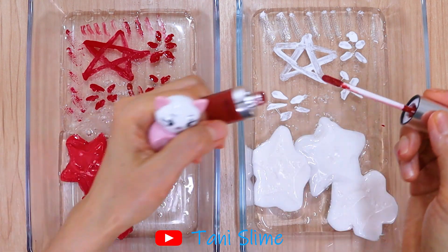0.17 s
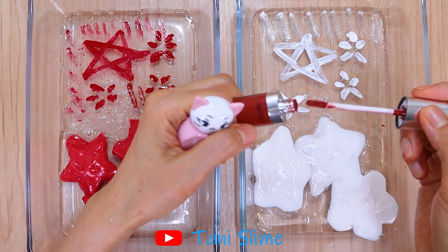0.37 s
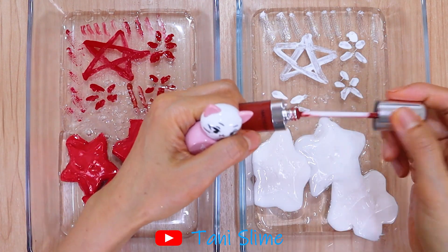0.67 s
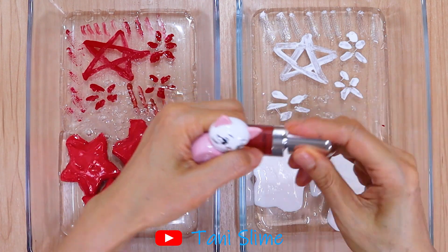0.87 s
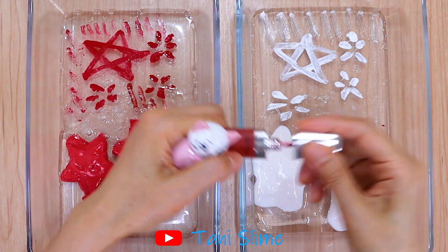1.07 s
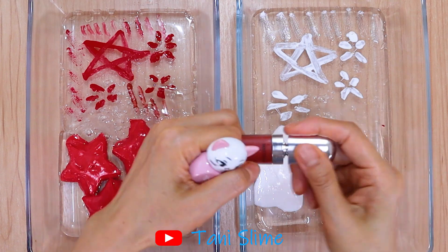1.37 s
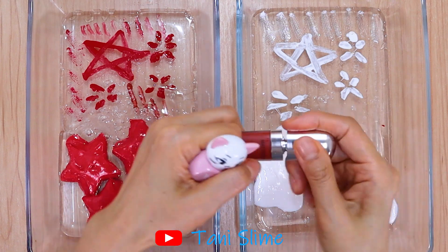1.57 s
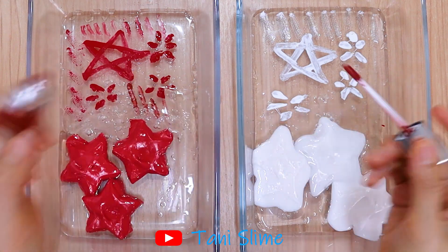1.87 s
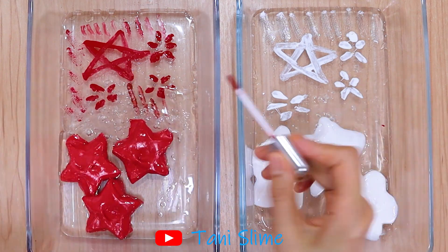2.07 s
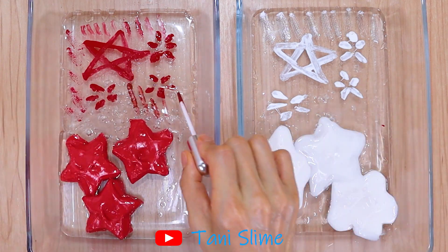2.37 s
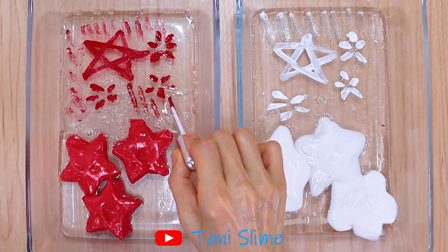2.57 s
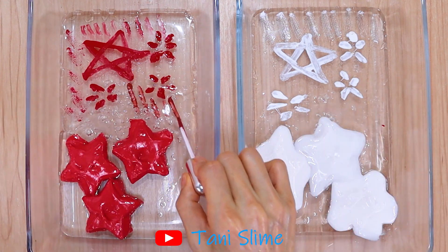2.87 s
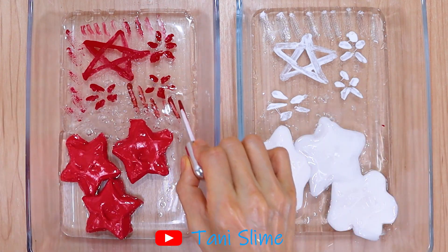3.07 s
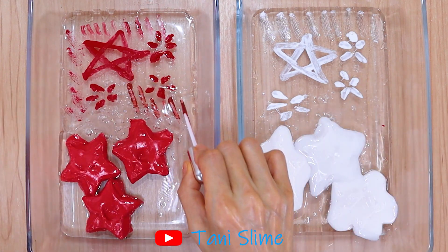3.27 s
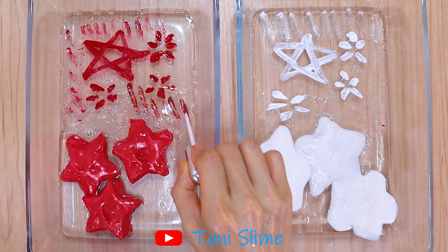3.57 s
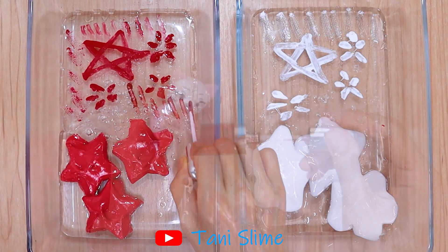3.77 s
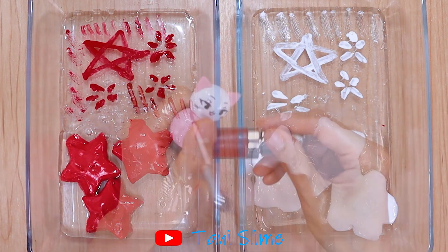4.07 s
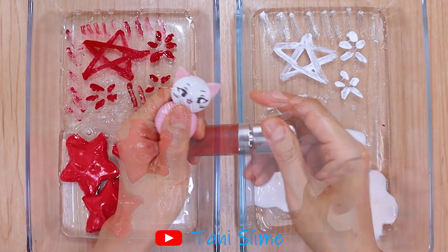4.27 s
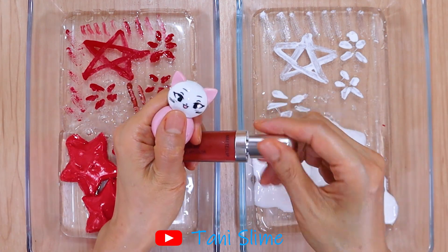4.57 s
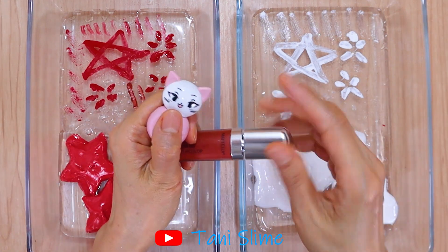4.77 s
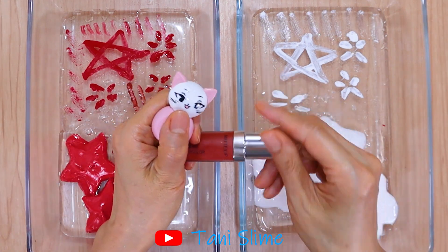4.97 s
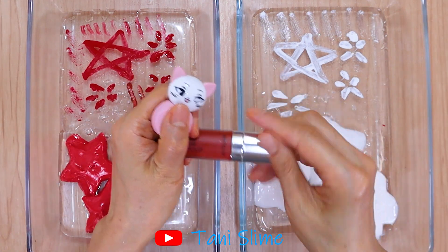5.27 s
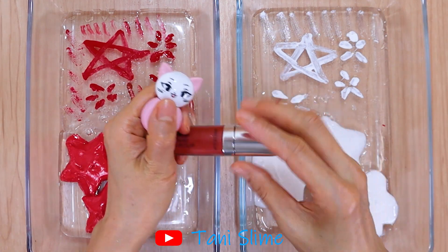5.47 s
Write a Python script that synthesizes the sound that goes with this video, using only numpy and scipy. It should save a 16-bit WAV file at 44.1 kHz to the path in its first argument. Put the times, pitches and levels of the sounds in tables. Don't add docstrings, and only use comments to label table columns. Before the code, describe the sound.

Close plastic handling in a quiet room: short bright squeaks, five hard clacks, a silent gap, a soft wet pop, a snap, two squeaky twists.

```python
import sys
import numpy as np
from scipy import signal
from scipy.fft import rfft, irfft
from scipy.io import wavfile
from scipy.ndimage import uniform_filter1d

SR = 44100
rng = np.random.default_rng(int(sys.argv[2]) if len(sys.argv) > 2 else 0)


def amp(db):
    return 10 ** (np.asarray(db, float) / 20)


def write(x):
    x = np.atleast_2d(x).T
    wavfile.write(sys.argv[1], SR, np.round(np.clip(x, -1, 1) * 32767).astype(np.int16))


N = 248283


def evened(x):
    return x / np.sqrt(np.mean(x ** 2) + 1e-20)


def read_spectrum(points, hz):
    f, value = np.transpose(points)
    return np.interp(np.log(hz + 1), np.log(f + 1), value)


def add(mix, start_s, sound):
    part = mix[round(start_s * SR):][:len(sound)]
    part += sound[:len(part)]


def high_passed(x, hz):
    return signal.sosfilt(signal.butter(4, hz, "high", fs=SR, output="sos"), x)


# pitch_hz, width_hz, level_db
HISS_DIP = (43, 9, -7)


def coloured(points):
    hz = np.fft.rfftfreq(N, 1 / SR)
    dip_hz, width_hz, depth_db = HISS_DIP
    dip_db = depth_db * np.exp(-((hz - dip_hz) / width_hz) ** 2)
    gain = amp(read_spectrum(points, hz) + dip_db)
    return evened(irfft(rfft(rng.standard_normal(N)) * gain, N))


# pitch_hz, level_db (per Hz)
HISS = [(18, -40.5), (30, -14.5), (53, -4.5), (114, -4.5), (149, -13.5), (179, -1), (226, -9), (302, -9),
        (448, -11), (538, -11), (1280, -14), (7430, -20), (8040, -20.5), (14700, -21), (15900, -21)]
# pitch_hz, level_db (rms), waver_hz
HUM = [(59.4, -70.5, 1.9), (171, -70.5, 11), (294.5, -74.5, 8), (421, -75, 5), (490, -82.5, 28),
       (796, -87, 8)]
# pitch_hz, level_db (rms)
WHINE = [(8220, -76.5), (8280, -76.5)]


def hiss_and_hum():
    t = np.arange(N) / SR
    out = amp(-59) * coloured(HISS)
    for hz, db, waver_hz in HUM:
        r = np.exp(-np.pi * waver_hz / SR)
        noise = rng.standard_normal(N) + 1j * rng.standard_normal(N)
        waver = signal.lfilter([1], [1, -r], noise)
        steady = 0.21
        hum = (steady + waver / np.std(waver)) * np.exp(2j * np.pi * hz * t)
        out += amp(db) * evened(hum.real)
    for hz, db in WHINE:
        out += amp(db) * np.sqrt(2) * np.sin(2 * np.pi * (hz * t + rng.random()))
    return out


# pitch_hz, level_db (per Hz)
SIDE_HISS = [(20, -17), (77, -12), (134, -4.5), (542, 0), (607, 0.5), (1290, -4.5), (1570, -3),
             (2910, -1.5), (14700, -3.5), (16000, -13)]
# time_s, level_db
BED_GAIN = [(0, 2), (1.4, 2), (1.475, 0), (1.6, 4.5), (1.712, 0.5), (1.8, 1.5), (1.93, -1.5), (2.0, -0.5),
            (2.08, 1), (2.25, -2.5), (2.47, 0), (3.03, 1.5), (5.63, 2)]


def background():
    level = amp(np.interp(np.arange(N) / SR, *np.transpose(BED_GAIN)))
    return level * hiss_and_hum(), level * amp(-71.5) * coloured(SIDE_HISS)


def pings(rows, rise_cycles):
    out, t = np.zeros(N), np.arange(8000) / SR
    for start_s, db, hz, t60_s in rows:
        envelope = amp(db - 60 * t / t60_s) * np.minimum(t * hz / rise_cycles, 1)
        add(out, start_s, envelope * np.sin(2 * np.pi * hz * t))
    return out


# start_s, level_db (peak), pitch_hz, t60_s
THUDS = [
    (.076, -40, 200, .1),
    (.075, -43, 400, .06),
    (2.125, -38, 180, .06),
    (2.141, -33, 190, .12),
    (1.262, -43, 290, .07),
    (2.132, -41, 120, .08),
    (1.187, -46, 190, .08),
    (1.554, -40, 450, .06),
    (4.491, -38, 380, .06),
]


def table_thuds():
    return pings(THUDS, rise_cycles=0.45)


def pressure(t, strokes):
    hardest_s, db, swell_ms, release_ms = np.transpose(strokes)[:, :, None]
    ms = (t - hardest_s) * 1000
    sunk = np.where(ms < 0, -ms / np.maximum(swell_ms, 2), ms / np.maximum(release_ms, 2))
    return np.sqrt((amp(db - 20 * sunk) ** 2).sum(axis=0))


def rubbing(span_s, strokes, swells, modes, slips_per_s, spread_db, patchy_db, scrape_db):
    at = np.arange(round(span_s[0] * SR), round(span_s[1] * SR) + 500)
    t, n = at / SR, len(at)
    happens = rng.random(n) < slips_per_s / SR
    strength = amp(spread_db * np.minimum(rng.exponential(1, n), 4))
    slips = rng.standard_normal(n) * happens * strength
    patchy_db = min(patchy_db, 3.5)
    squeak = np.zeros(n)
    for hz, width_hz, db in modes:
        turn = np.exp(2j * np.pi * hz * t)
        r = np.exp(-np.pi * width_hz * 1.5 / SR)
        wander = uniform_filter1d(rng.standard_normal(n), size=700)
        wander = evened(uniform_filter1d(wander, size=450))
        own_slips = np.roll(slips, rng.integers(n))
        rung = signal.lfilter([(1 - r) ** 2], [1, -2 * r, r ** 2], own_slips / turn)
        squeak += amp(db + patchy_db * wander) * (turn * rung).real
    band = signal.butter(2, [700, 16000], "band", fs=SR)
    scrape = evened(signal.lfilter(*band, rng.standard_normal(n)))
    press = pressure(t, strokes)
    swell_ms, release_ms = 13, 65
    swell = pressure(t, [(s, db, swell_ms, release_ms) for s, db in swells])
    sound = press * evened(squeak) + (amp(scrape_db) * press + swell) * scrape
    out = np.zeros(N)
    out[at] = sound * signal.windows.tukey(n, 1300 / n)
    return out


# start_s, end_s
WAND_S = [
    (1.11, 1.256),
    (1.37, 1.548),
    (1.635, 1.763),
    (1.85, 1.978),
    (2.07, 2.118),
]
# hardest_s, level_db, swell_ms, release_ms
WAND = [
    [(1.14, -50, 18, 30), (1.182, -43, 60, 23), (1.195, -35, 10, 26), (1.213, -39.5, 18, 67),
     (1.25, -37.5, 25, 30)],
    [(1.399, -46, 5, 22), (1.416, -46.5, 37, 50), (1.437, -47, 30, 25), (1.452, -48, 8.8, 20),
     (1.488, -47, 6, 46), (1.509, -45, 9.2, 60), (1.542, -51, 40, 15)],
    [(1.652, -47.5, 6, 24), (1.672, -45, 20, 26), (1.69, -49, 15, 25), (1.724, -44.5, 22, 30),
     (1.742, -48.5, 15, 30)],
    [(1.894, -50.5, 40, 44), (1.955, -46.5, 28, 33)],
    [(2.095, -55, 15, 40), (2.118, -45, 25, 10)],
]
# loudest_s, level_db
SWELLS_BEFORE_KNOCKS = [
    [(1.247, -42.5)],
    [(1.538, -42.5)],
    [(1.746, -45)],
    [(1.96, -46.5)],
    [(2.11, -47)],
]
# pitch_hz, width_hz, level_db
WAND_MODES = [
    [(2600, 190, -18), (3700, 250, -17.5), (5450, 560, -12), (6220, 250, -6), (7000, 200, 2),
     (7550, 280, -2), (8700, 200, -4), (9800, 150, -16.5), (11500, 250, -19), (12700, 400, -16),
     (14000, 250, -16)],
    [(2650, 150, -19), (3868, 200, -20.5), (5170, 300, -12), (6950, 180, -5), (7300, 150, -4.5),
     (7800, 250, 1), (9100, 250, -10)],
    [(4200, 250, -13.5), (5900, 120, -9.5), (6570, 150, -6.5), (6900, 150, -4), (7200, 150, -2.5),
     (7900, 160, -2.5), (9800, 150, -8.5), (10500, 200, -12.5)],
    [(2700, 200, -17.5), (6900, 120, -1.5), (7700, 210, -0.5), (9400, 300, -7.5)],
    [(2600, 300, -14), (7500, 400, 6.5), (9300, 300, -6.5)],
]


def wand_squeaks():
    passes = zip(WAND_S, WAND, SWELLS_BEFORE_KNOCKS, WAND_MODES)
    return sum(rubbing(*one, slips_per_s=13000, spread_db=1.5, patchy_db=2, scrape_db=-11) for one in passes)


# start_s, level_db (peak),
# pitch_hz, t60_s
CATCHES = [(1.1943, -22.5, 7500, 0.013), (1.4372, -22, 7680, 0.014), (1.449, -39, 6950, 0.03),
           (1.506, -35.5, 7160, 0.023), (1.514, -37.5, 7200, .02), (1.684, -30.5, 6900, 0.02),
           (1.684, -34, 7900, .025), (2.1238, -24, 7500, 0.047), (2.1238, -31.5, 6750, 0.02),
           (2.1298, -19, 7500, 0.022), (2.1525, -38, 7950, .03), (1.129, -48, 3700, 0.043),
           (1.458, -45.5, 5170, 0.024), (1.89, -44, 7720, .03), (1.946, -49, 6900, .06),
           (4.446, -28.5, 2940, 0.022), (4.447, -42, 5550, 0.045), (4.411, -50, 13200, .06),
           (4.464, -36.5, 8400, .012), (4.473, -42, 7120, 0.032), (5.072, -41, 5170, 0.074),
           (5.467, -35.5, 8800, 0.027), (1.304, -45, 2650, 0.046), (1.594, -42, 2600, 0.029)]


def small_catches():
    return pings(CATCHES, rise_cycles=7.8)


def causal(points, size=2048):
    db = read_spectrum(points, abs(np.fft.fftfreq(size, 1 / SR)))
    log_gain = np.log(amp(np.maximum(db, -100)))
    return np.fft.ifft(np.exp(np.conj(signal.hilbert(log_gain)))).real[:size // 2]


def ringing(modes, size):
    t, out = np.arange(size) / SR, np.zeros(size)
    for hz, width_hz, db in modes:
        out += amp(db) * width_hz * np.exp(-np.pi * width_hz * t) * np.sin(2 * np.pi * hz * t)
    return out


def rattle(length_ms):
    t_ms = np.arange(1024) * 1000 / SR
    shape = np.exp(-t_ms / length_ms) * np.minimum(t_ms / 0.27, 1)
    noise = rng.standard_normal(1024)
    for _ in range(6):
        z = rfft(noise * shape)
        flat = irfft(z / np.sqrt(abs(uniform_filter1d(abs(z) ** 2, size=5)) + 1e-30))
        noise = flat / np.sqrt(abs(uniform_filter1d(flat ** 2, size=21)) + 1e-30)
    return noise * shape


def clack(contacts, colour, rings, ring_db, low_cut_hz, high_cut_hz, bloom_ms):
    crack, ring = causal(colour, size=8192), ringing(rings, size=4096)
    body = crack / np.linalg.norm(crack) + amp(ring_db) * ring / np.linalg.norm(ring)
    t_ms = np.arange(1, len(body) + 1) * 1000 / SR
    body = body * np.minimum(t_ms / bloom_ms, 1)
    body = high_passed(high_passed(body, low_cut_hz), low_cut_hz)
    body = signal.sosfilt(signal.butter(5, high_cut_hz, fs=SR, output="sos"), body)
    out = np.zeros(N)
    for start_s, db, length_ms in contacts:
        sound = signal.fftconvolve(rattle(length_ms), body)
        add(out, start_s, amp(db) * sound / abs(sound).max())
    return out


# pitch_hz, t60_s
ROOM = [(300, 0.15), (1000, 0.14), (2500, 0.2), (5000, 0.18), (9000, 0.11), (15000, 0.068)]


def room():
    taps, size = np.zeros(SR // 2), 10
    at = np.arange(100, len(taps) - size, size)
    taps[at + rng.integers(0, size, len(at))] = rng.choice([-1., 1.], len(at))
    t_ms = np.arange(len(taps)) * 1000 / SR
    wall_ms, wall_db = 18, 3
    wall = amp(wall_db * np.exp(-((t_ms - wall_ms - 1.5) / 8.0) ** 2))
    taps *= np.clip(t_ms / 6.9, 0, 1) * wall
    hz, t, z = signal.stft(taps, SR, nperseg=128)
    over_db = 1 * np.maximum(t * 1000 - 49, 0)
    early = amp(-60 * t / read_spectrum(ROOM, hz)[:, None] - over_db)
    late_db, late_t60_s = -22, 0.4
    late = amp(late_db - 60 * t / late_t60_s)
    tail = signal.istft(z * (early + late), SR, nperseg=128)[1]
    z = rfft(tail)
    fine = uniform_filter1d(abs(z) ** 2, size=40)
    broad = uniform_filter1d(abs(z) ** 2, size=600)
    tail = irfft(z * np.sqrt(broad / fine))[:SR // 3]
    tail[:200] *= np.arange(200) / 200
    return tail / np.linalg.norm(tail)


# pitch_hz, level_db
ROOM_TILT = [(300, 2), (1000, 3), (2500, -3), (5000, -2.5), (9000, 4), (15700, 4)]


def echoes(hit, send_db, blur_hz):
    power, out, size = hit ** 2, np.zeros(N), 4096
    first = np.flatnonzero(hit)[0]
    spectrum = abs(rfft(hit[first:first + size])) ** 2
    broad = uniform_filter1d(spectrum, max(round(blur_hz * size / SR), 1))
    hz = np.fft.rfftfreq(size, 1 / SR)
    broad_db = 10 * np.log10(abs(broad) / broad.max() + 1e-10)
    colour = np.transpose([hz, broad_db + read_spectrum(ROOM_TILT, hz)])
    tail = signal.oaconvolve(room(), causal(colour, size=size))
    answer_s = np.searchsorted(np.cumsum(power), 0.18 * power.sum()) / SR
    add(out, answer_s, amp(send_db) * np.sqrt(power.sum()) * tail / np.linalg.norm(tail))
    return out


# start_s, level_db, length_ms
CLACKS = [
    [(1.2612, -1.5, 1.04), (1.2627, -4.5, 2), (1.2655, -7, 0.89), (1.2672, -3, 0.72), (1.2688, -8, 1.13)],
    [(1.5537, -2.5, 0.9), (1.5558, -10, 1.7), (1.5585, -2, 0.32), (1.5594, -4.5, 1.5)],
    [(1.7694, 5, 0.99), (1.771, -1.5, 1.06), (1.775, -12, 0.64)],
    [(1.9845, -37.5, 1.7), (1.9851, 3, 1.39), (1.9867, -2, 1.1), (1.9988, -13.5, 3.1)],
    [(2.1255, -17.5, 3.2), (2.1321, -7.5, 0.87), (2.1335, -10, 2.24), (2.1372, -9, 1.28),
     (2.1455, -22.5, 2.5)],
    [(3.8079, -13, 0.021)],
    [(4.4903, -4, 2.2), (4.4925, -6.5, 2.3), (4.498, -2.5, 1.1), (4.5005, -15, 1)],
]
# pitch_hz, level_db
COLOURS = [
    [(120, -85.5), (200, -31), (600, -19), (1000, -20.5), (1390, -10), (1640, -16), (2600, -3), (3020, -12),
     (5060, -18), (6550, -19), (14500, -31), (16400, -54.5)],
    [(120, -54.5), (200, -30), (361, -41.5), (652, -13.5), (1700, -5), (2650, 4), (3500, -6), (5160, -7.5),
     (5650, -7.5), (15000, -29), (16400, -54.5)],
    [(120, -59), (200, -37), (876, -6.5), (1500, -23.5), (2460, 0), (4970, -2.5), (8030, -9), (8810, -6.5),
     (9480, -14), (14000, -12), (16400, -47.5)],
    [(120, -67.5), (200, -39), (876, -6.5), (1900, -9), (2600, 6), (3910, -1.5), (7060, -4.5), (9140, -12),
     (10000, -11.5), (14800, -16.5), (16400, -39.5)],
    [(59, -34.5), (100, -7.5), (430, -22), (600, -42), (900, -4), (1480, -5), (2080, -17), (2860, -4),
     (3400, -18.5), (4030, -9), (7480, -12), (13900, -32), (15500, -19.5), (16500, -49.5)],
]
# pitch_hz, level_db
POP_COLOUR = [(500, -38), (786, -9), (1160, -24), (1360, 1), (1910, -45), (2650, 15), (3930, -41),
              (5000, -55)]
# pitch_hz, level_db
SNAP_COLOUR = [(120, -54), (200, -29), (1110, -3.5), (2510, -0.5), (2800, -1), (4060, -6.5), (8650, -7.5),
               (10800, -20), (12100, -37.5), (14200, -23), (16500, -48.5)]
# pitch_hz, width_hz, level_db
RINGS = [
    [(1390, 44, -8.5), (2130, 95, -8.5), (2675, 85, 3.5), (3500, 130, -15), (4430, 180, -12.5),
     (5080, 240, -3), (6100, 200, -13), (7480, 220, -12.5), (8260, 170, -16.5)],
    [(1576, 100, -5.5), (2080, 77, -3), (2380, 74, -9), (2620, 48, 3.5), (3237, 140, -10.5),
     (4140, 70, -5.5), (4670, 100, -4), (5023, 320, -8), (6370, 76, -13.5)],
    [(950, 370, -3.5), (2550, 150, -4.5), (3520, 140, 2), (4620, 180, -6), (6040, 570, -0.5),
     (6440, 500, 4.5), (8760, 290, -8), (13200, 1800, -10)],
    [(990, 200, -19), (2770, 220, 7.5), (3700, 100, -11), (5670, 240, 3.5), (7000, 390, 5), (8463, 300, 1),
     (10030, 220, -1.5), (13100, 470, -4)],
    [(730, 25, 8), (1050, 60, -23), (1260, 82, -17), (1565, 54, 5), (1880, 65, -6.5), (2470, 72, 7),
     (3120, 56, -11), (4790, 120, -17.5), (6750, 770, -3), (7520, 330, -4.5)],
]
# pitch_hz, width_hz, level_db
POP_RINGS = [(856, 40, -5), (921, 30, 3), (1050, 200, -7), (1174, 75, -4), (1550, 42, -2), (1879, 55, -2),
             (2250, 90, -10), (2620, 150, -16), (2945, 60, -17), (3187, 90, -22), (4500, 300, -40)]
# pitch_hz, width_hz, level_db
SNAP_RINGS = [(1600, 150, -9.5), (2304, 74, -2), (2730, 90, 1), (2970, 47, 4.5), (5770, 210, -9),
              (6600, 110, -17.5), (8400, 200, -32.5), (11640, 680, -12.5)]
RING_DB = [1, -1.5, -9.5, -7.5, -6.5, 22, -5.5]
LOW_CUT_HZ = [423, 340, 257, 760, 101, 840, 226]
HIGH_CUT_HZ = [15700, 15800, 15700, 15400, 14800, 3700, 15960]
BLOOM_MS = [.05, .05, .05, .05, .05, .6, .05]
ROOM_SEND_DB = [-11, -10.5, -11, -10, -12, -10, -9]
ROOM_BLUR_HZ = [510, 496, 801, 812, 150, 60, 820]


def clacks_pop_and_snap():
    colours = COLOURS + [POP_COLOUR, SNAP_COLOUR]
    rings = RINGS + [POP_RINGS, SNAP_RINGS]
    knocks = zip(CLACKS, colours, rings, RING_DB, LOW_CUT_HZ, HIGH_CUT_HZ, BLOOM_MS)
    hits, answers = np.zeros(N), np.zeros(N)
    for knock, send_db, blur_hz in zip(knocks, ROOM_SEND_DB, ROOM_BLUR_HZ):
        hit = clack(*knock)
        hits += hit
        answers += echoes(hit, send_db, blur_hz)
    return hits, answers


# start_s, end_s
HANDLED_S = [
    (4.4, 4.484),
    (4.91, 5.15),
    (5.33, 5.5),
    (3.76, 3.8),
]
# hardest_s, level_db, swell_ms, release_ms
SUCK = [
    (3.807, -48.5, 70, 4.2),
]
# pitch_hz, width_hz, level_db
SUCK_MODES = [(1030, 470, 0.45), (2320, 600, -2)]


def gloss_suck():
    return rubbing(HANDLED_S[3], SUCK, [(3.8, -64)], SUCK_MODES,
                   slips_per_s=9800, spread_db=1.2, patchy_db=1.34, scrape_db=-24)


# hardest_s, level_db, swell_ms, release_ms
SLIDE = [
    (4.415, -54, 25, 170),
    (4.449, -44, 16, 230),
    (4.484, -59, 10, 5),
]
# loudest_s, level_db
SLIDE_SWELLS = [(4.479, -45.5)]
# pitch_hz, width_hz, level_db
SLIDE_MODES = [(2940, 310, -1), (5550, 190, 0), (7120, 340, 1), (8400, 550, 2), (9770, 250, 4.5),
               (12600, 200, -10), (13200, 150, 2)]


def cap_slide():
    return rubbing(HANDLED_S[0], SLIDE, SLIDE_SWELLS, SLIDE_MODES,
                   slips_per_s=14000, spread_db=1.48, patchy_db=2.5, scrape_db=-5)


# hardest_s, level_db, swell_ms, release_ms
CAP = [
    (4.958, -42.5, 27, 40),
    (4.986, -35, 49, 92),
    (5.077, -38, 25, 18),
    (5.095, -55, 10, 95),
]
# loudest_s, level_db
CAP_SWELLS = [(5.078, -58)]
# pitch_hz, width_hz, level_db
CAP_MODES = [(2800, 270, -10), (3570, 120, -2.5), (4390, 200, -3.5), (5170, 260, -6), (5730, 326, 2),
             (6300, 186, 1), (7150, 570, -6), (8160, 150, 5), (7700, 310, 3), (8670, 310, 3.5),
             (9500, 200, -7), (10100, 330, -10), (11200, 300, -10), (12700, 300, -0.5), (13800, 360, -1),
             (14600, 700, -21)]
# hardest_s, level_db, swell_ms, release_ms
CAP_AGAIN = [
    (5.353, -50, 6.5, 36),
    (5.369, -37.5, 35, 86),
    (5.395, -37.5, 85, 60),
    (5.445, -50, 28, 33),
    (5.468, -45.5, 51, 8.3),
]
# loudest_s, level_db
AGAIN_SWELLS = [(5.406, -59)]
# pitch_hz, width_hz, level_db
AGAIN_MODES = [(2750, 75, -11), (3590, 184, -0.5), (4390, 190, -7), (5100, 250, -12), (5560, 110, -1.5),
               (6030, 700, -6), (7200, 210, -9), (7960, 490, -0.5), (8800, 540, -6), (9700, 176, -6),
               (10100, 460, -19), (12580, 740, -9), (13900, 700, -14)]


def cap_twists():
    first = rubbing(HANDLED_S[1], CAP, CAP_SWELLS, CAP_MODES,
                    slips_per_s=10000, spread_db=0.87, patchy_db=5.1, scrape_db=-23)
    second = rubbing(HANDLED_S[2], CAP_AGAIN, AGAIN_SWELLS, AGAIN_MODES,
                     slips_per_s=11000, spread_db=0.48, patchy_db=4.1, scrape_db=-27)
    return first + second


def scene():
    mid, side = background()
    small = table_thuds() + wand_squeaks() + small_catches() + cap_slide() + cap_twists()
    mid += small + amp(-10.5) * signal.oaconvolve(small, room())[:N]
    hits, answers = clacks_pop_and_snap()
    mid += answers + gloss_suck()
    side += amp(-50) * signal.oaconvolve(small + hits, room())[:N]
    edge = signal.firwin(1023, 15750, window=("kaiser", 9), fs=SR)
    return hits + signal.oaconvolve(np.array([mid + side, mid - side]), edge[None], "same")


def roll_off(x):
    return signal.sosfilt(signal.butter(12, 16810, fs=SR, output="sos"), x)


def record(dry):
    t = np.arange(N) / SR
    knee, headroom, bass_hz = 0.45, 0.2, 400
    over = np.maximum(abs(dry) - knee, 0)
    excess = np.sign(dry) * (over - headroom * np.tanh(over / headroom))
    held = dry - high_passed(excess, bass_hz)
    top_hz = 16400
    held = signal.sosfilt(signal.cheby2(12, 70, top_hz + 600, fs=SR, output="sos"), held)
    cut_out_s, cut_in_s = 2.4685, 3.0385
    return roll_off(held * ((t < cut_out_s) | (t > cut_in_s)))


dry = scene()
out = record(dry)
write(out)
```